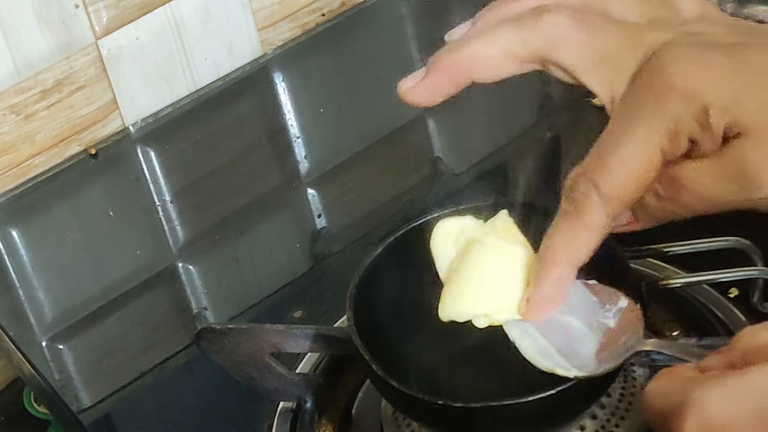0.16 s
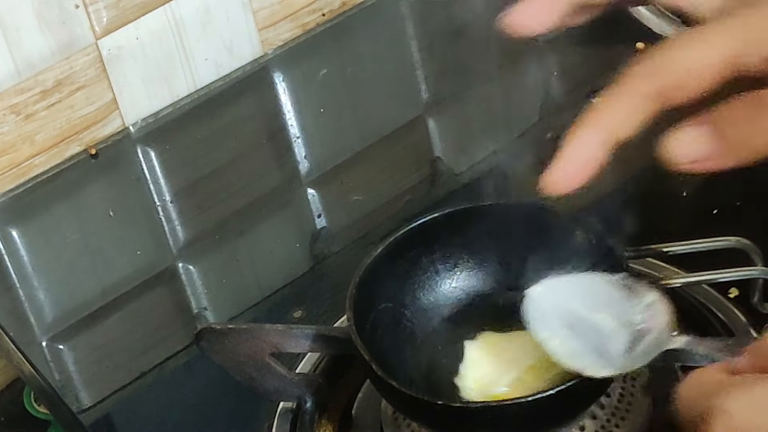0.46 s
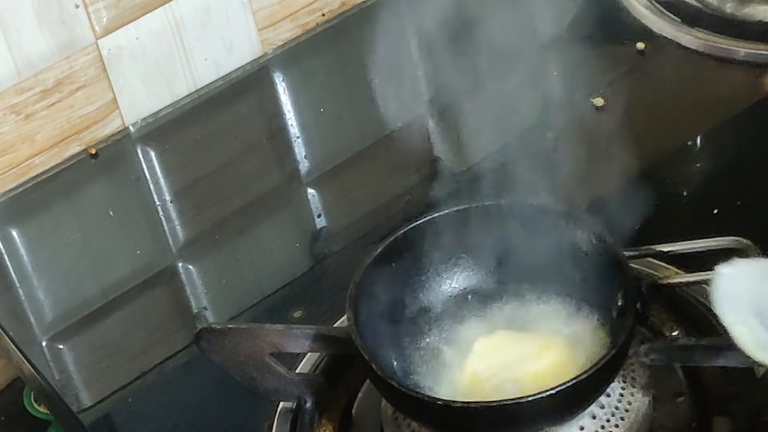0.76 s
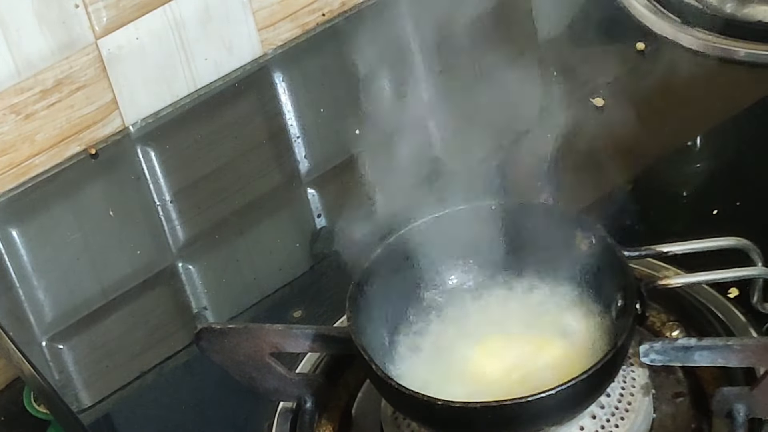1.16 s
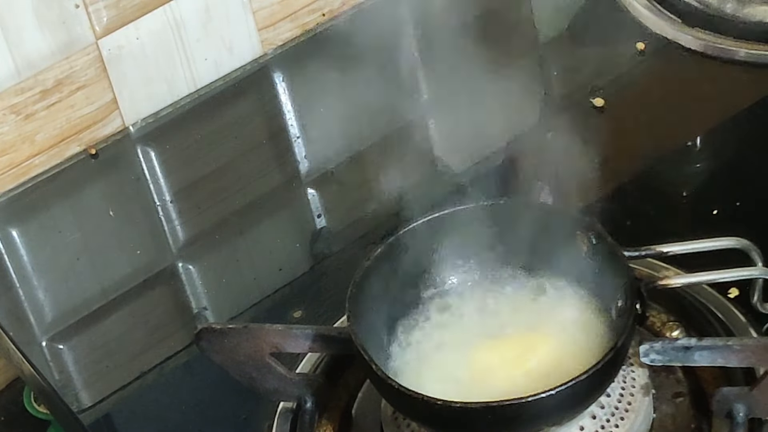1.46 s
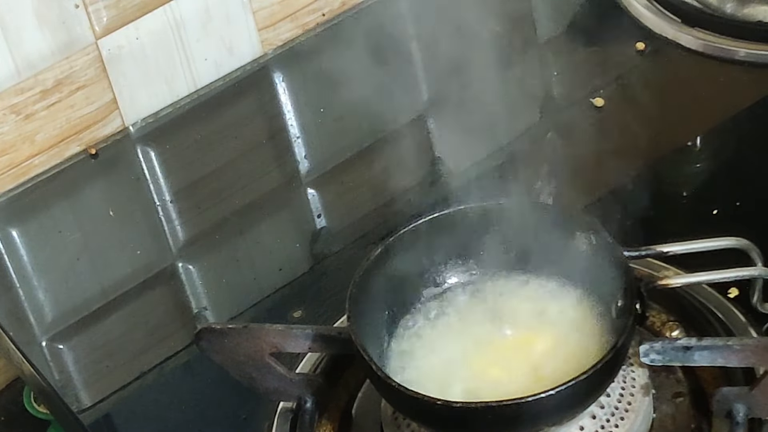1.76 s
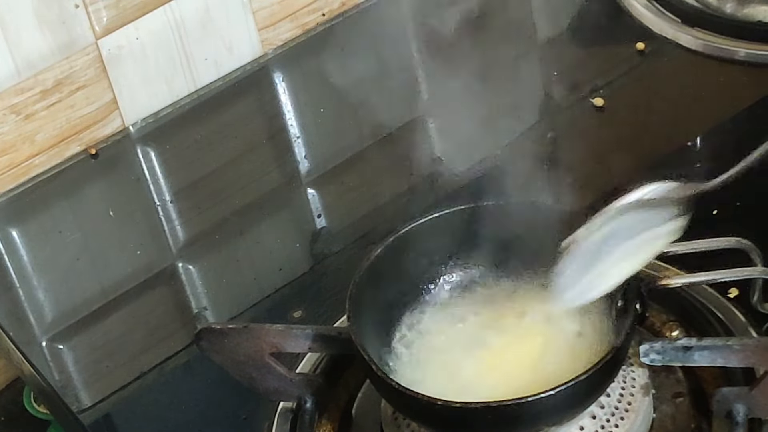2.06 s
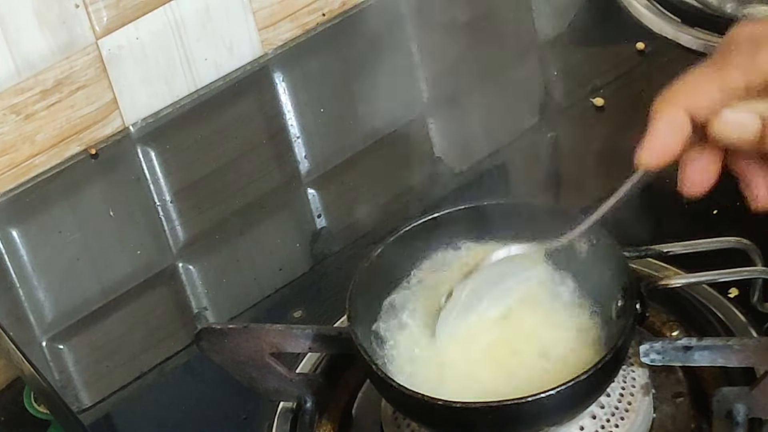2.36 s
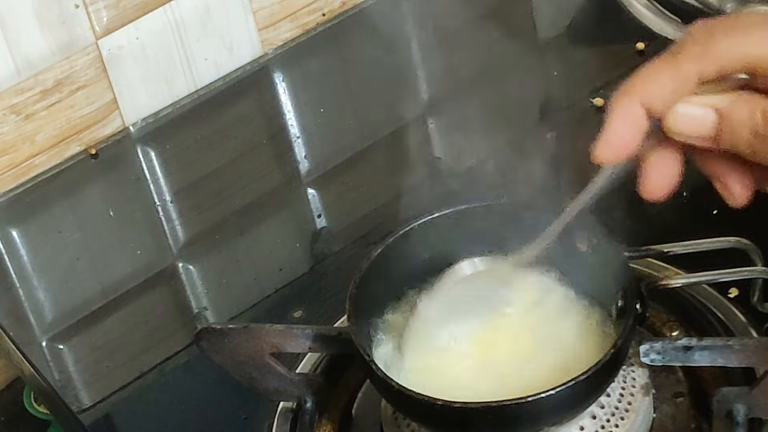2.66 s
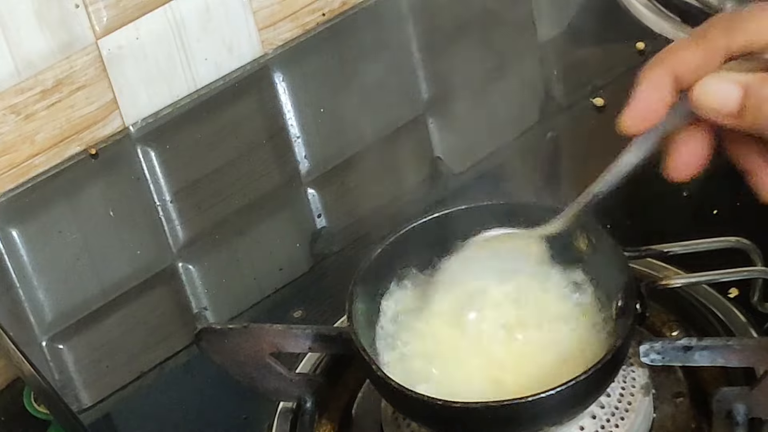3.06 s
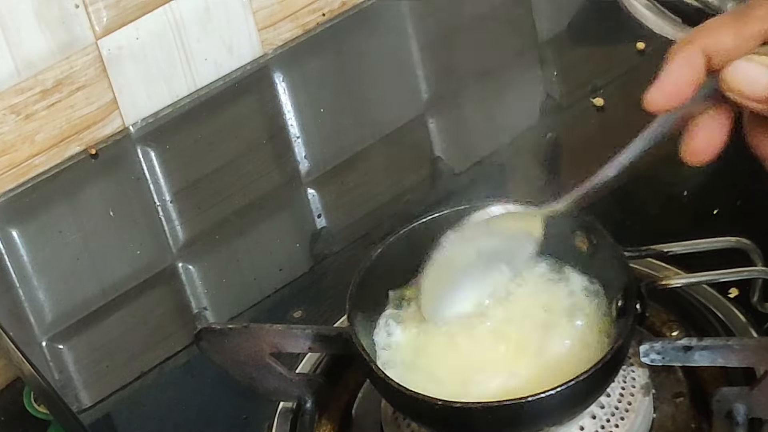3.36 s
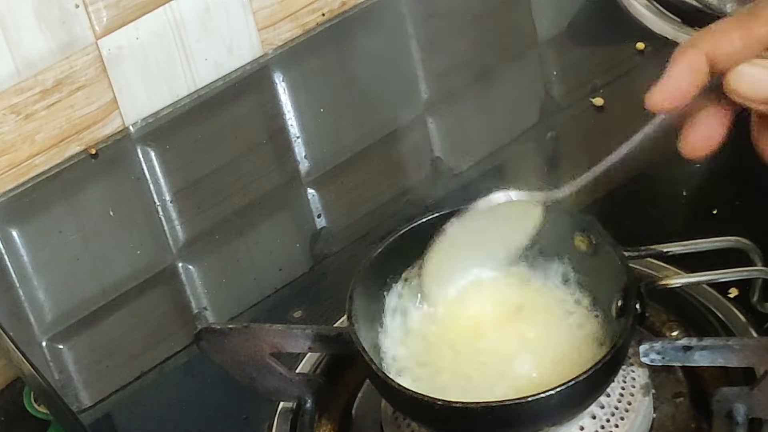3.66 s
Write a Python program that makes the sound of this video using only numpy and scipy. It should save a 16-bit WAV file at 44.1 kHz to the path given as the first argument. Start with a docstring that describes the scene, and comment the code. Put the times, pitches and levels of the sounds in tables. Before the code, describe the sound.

Butter sizzles in a small hot pan, recorded close in stereo. Faint ticks and a soft oil swish come first; from 0.3 s sizzling surges, strongest around 0.9 s, with dense, loud, ringing pops and spray from 0.4 to 1.1 s. Pops thin out by 1.65 s as it settles to fizz. Stirring lifts it near 2.5 s, then it fades. Low rumble, faint hum and short tiled-room reflections underneath.

```python
"""Butter in hot oil, small steel pan. First drops spit: ringing steam pops with cracks and noise sprays.
Water boils off in a hard sizzle, random bubble grains over hiss, amid loud pops.
It settles to a fizz that swells when a spoon stirs it; dull noise swishes mark butter or spoon pushing oil.
Throughout: walls return a noise tail, and the kitchen has shaped-noise rumble, a hum and a deep throb."""
import sys
import numpy as np
from scipy import signal
from scipy.fft import rfft, irfft
from scipy.io import wavfile

SR = 44100
rng = np.random.default_rng(int(sys.argv[2]) if len(sys.argv) > 2 else 0)


def transcribe(u):
    """Save the signal u as a 16-bit wav file named by the first command-line argument.

    u: samples, shape (n,) or (channels, n), limited to [-1, 1]; the rate is SR.
    q: integer samples, one column per channel.
    """
    v = np.clip(np.atleast_2d(u).T, -1, 1)
    q = np.round(v * 32767).astype(np.int16)
    wavfile.write(sys.argv[1], SR, q)


N = 167580

# Sizzle vigour; dull and treble parts re level: time_s, level_db, dull_db, treble_db
SIZZLE_CURVE = [(.298, -42.5, -15, 6), (.36, -31, -20.5, -4), (.43, -28, -12, -5), (.52, -27, -17.5, -2),
                (.72, -27.5, -12, -4), (.82, -25.5, -14.5, -4.5), (.93, -24.5, -11.5, -6),
                (1.04, -25.5, -9, -6), (1.13, -29, -13, -6.5), (1.45, -31.5, -11, -5.5),
                (1.7, -33.5, -9.5, -5), (2.0, -34, -7, -6), (2.25, -35.5, -9, -6), (2.38, -32, -9, -7.5),
                (2.51, -29.5, -14.5, -4), (2.64, -31, -12.5, -5.5), (2.82, -34.5, -10, -5.5),
                (2.98, -37, -8, -5.5), (3.67, -39.5, -7.5, -6), (3.8, -38.5, -8.5, -7.5)]
# Sizzle spectrum, relative density: frequency_hz, density_db
FIZZ_SPECTRUM = [(260, -2), (450, -3), (579, -22), (768, -5.5), (1080, -4.5), (1290, -2), (1660, 1.5),
                 (2830, -2.5), (3240, -2.5), (6790, -7), (7650, -8), (15600, -8.5)]
# Pan resonances, relative gain: frequency_hz, width_hz, gain_db
PAN_RESONANCES = [(817, 90, 2.5), (1303, 36, 7.5), (1617, 25, 8), (1810, 13, 11.5), (1960, 11, 1),
                  (2040, 107, 4), (2274, 35, 5.5), (3910, 120, -2), (6800, 1440, 1)]
# Steam pops; crack and spray re ring peak: start_s, level_db, pitch_hz, crack_db, spray_db, spray_t60_s
STEAM_POPS = [(.002, -42, 7700, -30, -6, 0.075), (0.05, -32.5, 6800, -22, -8.5, 0.045),
              (0.2077, -12, 6550, -20, -16.5, 0.1), (0.268, -28, 13900, -22, -13, .085),
              (0.303, -35.5, 6300, -16, -3, 0.44), (0.338, -17.5, 4300, -30, -10.5, 0.13),
              (0.3956, -10, 3800, -12, -14, 0.12), (0.3983, -7.5, 4970, -19, -19, 0.08),
              (0.5005, -18.5, 12000, -0.5, -18, 0.051), (0.5268, -15, 6800, -4, -12.5, 0.07),
              (0.542, -13.5, 11000, -9, -14, 0.044), (0.6414, -18, 5000, 10.5, -8, .05),
              (0.682, -12.5, 3900, -9, -29, 0.061), (0.7302, -6, 11800, -3, -4, 0.033),
              (0.7723, -11, 6560, -26, -27, 0.048), (0.8039, -3, 2600, -6, -8, 0.055),
              (.823, -12, 6370, -14, -17, .05), (0.858, -5, 3500, -27, -12, 0.094),
              (0.8597, -12.5, 2380, -22, -14.5, 0.3), (0.906, -18, 4500, 6.5, -8, 0.046),
              (0.9606, -7, 1950, -5, -11, 0.11), (0.9863, -18.5, 2040, 12, -6.5, 0.072),
              (1.0086, -4.5, 1220, -1, -12, 0.05), (1.0083, -7, 4600, -16, -12.5, 0.073),
              (1.0146, -12, 900, -20, -3, 0.081), (1.078, -14.5, 6800, -20, -23, 0.12),
              (1.235, -12.5, 6360, -7, -31, 0.084), (1.415, -18.5, 5230, -2.5, -22, .1),
              (1.461, -15, 9400, -24, -28, 0.068), (1.649, -14.5, 3670, -17, -13, 0.058),
              (2.269, -22.5, 3360, 0, -8.5, 0.08), (3.7693, -32, 4130, 8, -1, 0.044)]
# Butter or spoon pushes the oil: peak_s, level_db, rise_s, fall_s, centre_hz
OIL_SWISHES = [(0.148, -39, 0.0067, 0.02, 1700), (2.169, -38, 0.012, 0.0074, 1400),
               (2.48, -38.5, 0.052, 0.068, 1190), (3.11, -39, 0.025, 0.068, 1180)]
# Kitchen and flame spectrum, relative density: frequency_hz, density_db
RUMBLE_SPECTRUM = [(26, -43), (45, 14.5), (173, -3.5), (327, -17), (602, -18.5), (732, -19), (1860, -25),
                   (4480, -32.5), (8000, -40), (14500, -32), (15600, -67)]
# Deep throb in the rumble: time_s, level_db
THROB_CURVE = [(0, -41), (1.3, -39), (1.46, -25.5), (1.7, -26), (1.88, -45.5), (2.01, -30.5), (2.1, -48),
               (2.5, -47), (2.72, -32), (2.85, -46), (3.16, -33), (3.5, -46), (3.6, -33.5), (3.8, -46)]
# Stereo width: frequency_hz, side_minus_mid_db
STEREO_WIDTH = [(60, -27), (200, -11), (500, -3.5), (1290, 0.5), (2380, -2.5), (15000, -1)]
# Wavering tones: frequency_hz, width_hz, level_db
HUM_TONES = [(99.6, 7.9, -40.5), (324.2, 24, -54)]

# Sizzle
DULL_BELOW_HZ, TREBLE_ABOVE_HZ = 2746, 7200
SURGE_DB, SURGE_RATE_HZ, FLICKER_DB, FLICKER_RATE_HZ = 0.9, 17, 0.78, 84
SMOOTH_POWER_SHARE = 0.68  # hiss; the rest is bubble grains
GRAINS_PER_S, GRAIN_SPREAD_DB = 9000, 2  # rate at unit surge
GRAIN_CYCLES = 12.3  # to about -40 dB
PATCH_DB, PATCH_RATE_HZ = 2, 11  # each bubble pitch swells on its own
# Pops
POP_T60_S, POP_T60_CYCLES = 0.0023, 1  # ring t60 is their sum
CRACK_HZ, CRACK_OCTAVES = 2600, 3.25
THUMP_HZ, THUMP_DB, THUMP_T60_S = 198, -17, 0.0091  # dB re crack
SPRAY_OCTAVES, SPRAY_WIDENS_HZ = 0.89, 710  # low sprays are wider
SPRAY_LUMP_DB, SPRAY_LUMP_RATE_HZ = 2, 230
ECHO_S, ECHO_DB = 0.0018, -6  # off the far wall of the pan
PHASE_TURN_HZ, PHASE_TURN_WIDTH_HZ = 1400, 350
# Pan, swishes, room
PAN_RESONANCE_DB, SWISH_OCTAVES = -6.5, 2.18
KITCHEN_T60_S, KITCHEN_DB, WALL_BAND_HZ = 0.29, -9.5, [500, 19300]
RUMBLE_DB, THROB_HZ, THROB_WIDTH_HZ = -39, 26.56, 7.5
CEILING, CUTOFF_HZ = 1.0, 15760


def amp(db):
    """dB to gain."""
    return 10 ** (np.asarray(db) / 20)


def rms_one(x):
    """Scale to rms 1."""
    return x / np.sqrt(np.mean(x ** 2) + 1e-20)


def in_time(rows):
    """Interpolate a curve's columns, sample by sample."""
    time_s, *columns = np.transpose(rows)
    return [np.interp(np.arange(N) / SR, time_s, column) for column in columns]


def at_hz(points, hz):
    """Read a spectrum on a log frequency axis."""
    point_hz, point_db = np.transpose(points)
    return np.interp(np.log(hz + 1), np.log(point_hz), point_db)


def drift(rate_hz):
    """Noise through a two-pole low-pass; rms 1."""
    r = np.exp(-2 * np.pi * rate_hz / SR)
    noise = rng.standard_normal(N + SR)
    return rms_one(signal.lfilter([1], [1, -2 * r, r * r], noise)[SR:])


def resonance_poles(hz, width_hz):
    """Pole radius and denominator of one resonance."""
    r = np.exp(-np.pi * width_hz / SR)
    return r, [1, -2 * r * np.cos(2 * np.pi * hz / SR), r * r]


def resonate(x, hz, width_hz):
    """One resonance, gain 1 on top."""
    r, poles = resonance_poles(hz, width_hz)
    return signal.lfilter((1 - r * r) / 2 * np.array([1, 0, -1]), poles, x)


def band(x, hz, octaves):
    """Band-pass around a centre; rms 1."""
    edges_hz = hz * 2 ** (np.array([-0.5, 0.5]) * octaves)
    edges_hz = np.clip(edges_hz, 30, [0.4 * SR, 0.45 * SR])
    return rms_one(signal.sosfilt(signal.butter(3, edges_hz, "band", fs=SR, output="sos"), x))


def spread(pair, spectrum):
    """Colour two signals alike as mid and side; return left and right."""
    hz = np.arange(N // 2 + 1) * SR / N
    mid, side = rfft(pair) * amp(at_hz(spectrum, hz))
    side = side * amp(at_hz(STEREO_WIDTH, hz))
    return irfft([mid + side, mid - side], N)


def sizzle():
    """Bubble bursts over smooth hiss, in surges; level, dull part and treble follow the vigour."""
    level_db, dull_db, treble_db = in_time(SIZZLE_CURVE)
    surge = amp(SURGE_DB * drift(SURGE_RATE_HZ) + FLICKER_DB * drift(FLICKER_RATE_HZ))
    grains = np.sqrt(1 - SMOOTH_POWER_SHARE) * bubbles(surge)
    hiss = np.sqrt(SMOOTH_POWER_SHARE) * rng.standard_normal((2, N))
    fizz = spread(pan_bowl(surge * (grains + hiss)), FIZZ_SPECTRUM)

    hz, spectrum = np.arange(N // 2 + 1) * SR / N, rfft(fizz)
    dull = irfft(spectrum / (1 + (hz / DULL_BELOW_HZ) ** 8), N)
    treble = irfft(spectrum / (1 + (TREBLE_ABOVE_HZ / (hz + 1)) ** 8), N)
    body = fizz - dull - treble
    parts = body / np.std((body + treble).mean(0))
    parts = parts + amp(dull_db) * dull / np.std(dull.mean(0))
    parts = parts + amp(treble_db) * treble / np.std(treble.mean(0))
    onset = np.arange(N) / SR > SIZZLE_CURVE[0][0]
    return onset * amp(level_db) * parts


def bubbles(surge):
    """Random bursts, dealt over 28 pitches, ring a few cycles each; signs and sizes differ by side."""
    hits = rng.random(N) < GRAINS_PER_S * surge / SR
    sizes = amp(GRAIN_SPREAD_DB * np.minimum(rng.exponential(1, N), 3)) * hits
    sizes = sizes * rng.standard_normal((2, N))
    dealt = rng.integers(0, 28, N)
    total = 0
    for k, hz in enumerate(np.geomspace(500, 16000, 28)):
        rings = rms_one(resonate(sizes * (dealt == k) + 1e-18, hz, 1.42 * hz / GRAIN_CYCLES))
        total = total + np.sqrt(hz) * amp(PATCH_DB * drift(PATCH_RATE_HZ)) * rings
    return rms_one(total)


def pops():
    """Each steam pocket cracks, thumps the pan, rings, echoes and throws a lumpy dying spray."""
    t = np.arange(SR // 4) / SR
    bursts, sprays = np.zeros(N + SR), np.zeros((2, N + SR))
    crack = band(1. * (t == 0), CRACK_HZ, CRACK_OCTAVES)
    thump = amp(THUMP_DB - 60 * t / THUMP_T60_S) * np.sin(2 * np.pi * THUMP_HZ * t)
    crack = crack / crack.max() + thump
    lumps = amp(SPRAY_LUMP_DB * drift(SPRAY_LUMP_RATE_HZ))
    for start_s, level_db, hz, crack_db, spray_db, spray_t60_s in STEAM_POPS:
        i = int(start_s * SR)
        span = slice(i, i + len(t))
        decay = amp(-60 * t / (POP_T60_S + POP_T60_CYCLES / hz))
        ring = np.sin(2 * np.pi * hz * t) * (1 - np.exp(-t * hz * 2)) * decay
        burst = ring / np.abs(ring).max() + amp(crack_db) * crack
        echo = amp(ECHO_DB) * np.roll(burst, int(ECHO_S * SR))
        bursts[span] += amp(level_db) * (burst + echo)

        noise = rng.standard_normal((3, len(t)))
        # third noise is common to both sides
        spray = band(noise[:2] + noise[2], hz, SPRAY_OCTAVES + SPRAY_WIDENS_HZ / hz)
        spray = spray * amp(spray_db - 60 * t / spray_t60_s)
        sprays[:, span] += amp(level_db) * spray * np.roll(lumps, -i)[:len(t)]
    return bursts[:N] + turn_left_phase(sprays[:, :N])


def turn_left_phase(x):
    """All-pass on the left: phase turns around one pitch, level stays."""
    _, poles = resonance_poles(PHASE_TURN_HZ, PHASE_TURN_WIDTH_HZ)
    return np.array([signal.lfilter(poles[::-1], poles, x[0]), x[1]])


def pan_bowl(x):
    """The pan's hollow resonates, lifting some pitches."""
    return x + sum(amp(PAN_RESONANCE_DB + gain_db) * resonate(x, hz, width_hz)
                   for hz, width_hz, gain_db in PAN_RESONANCES)


def swishes():
    """Pushed oil: soft swells of dull noise through the pan resonances."""
    t, out = np.arange(N) / SR, 0
    for peak_s, level_db, rise_s, fall_s, hz in OIL_SWISHES:
        shape = np.exp(-((t - peak_s) / np.where(t < peak_s, rise_s, fall_s)) ** 2)
        out = out + amp(level_db) * shape * band(rng.standard_normal((2, N)), hz, SWISH_OCTAVES)
    return pan_bowl(out)


def kitchen(x):
    """Tiled walls return a dying noise tail, independent per side."""
    t = np.arange(SR // 2) / SR
    tail = rng.standard_normal((2, len(t))) * amp(-60 * t / KITCHEN_T60_S) * (t > 0.004)
    tail = signal.sosfilt(signal.butter(1, WALL_BAND_HZ, "band", fs=SR, output="sos"), tail)
    tail = tail / np.sqrt(np.sum(tail ** 2, axis=1, keepdims=True))
    return amp(KITCHEN_DB) * signal.fftconvolve(x, tail, axes=1)[:, :N]


def rumble():
    """Steady shaped noise, plus hum and throb as noise through narrow resonances."""
    floor = rms_one(spread(rng.standard_normal((2, N)), [(20, -48)] + RUMBLE_SPECTRUM))
    hum = 0
    for hz, width_hz, level_db in HUM_TONES:
        tone = resonate(rng.standard_normal(N + SR), hz, width_hz)[SR:]
        hum = hum + amp(level_db) * rms_one(tone)
    throb = resonate(rng.standard_normal(N + SR), THROB_HZ, THROB_WIDTH_HZ)
    throb = rms_one(resonate(throb, THROB_HZ, 2 * THROB_WIDTH_HZ)[SR:])
    return amp(RUMBLE_DB) * floor + hum + amp(in_time(THROB_CURVE)[0]) * throb


def scene():
    """Pan in front, room around; only pops and sizzle feed the wall tail."""
    pan = pan_bowl(pops()) + sizzle()
    return pan + kitchen(pan) + swishes() + rumble()


def record(dry):
    """Clip peaks at the ceiling, then cut the top steeply."""
    low_pass = signal.ellip(12, 0.3, 70, CUTOFF_HZ, fs=SR, output="sos")
    return signal.sosfilt(low_pass, np.clip(dry, -CEILING, CEILING))


dry = scene()
out = record(dry)
transcribe(out)
```